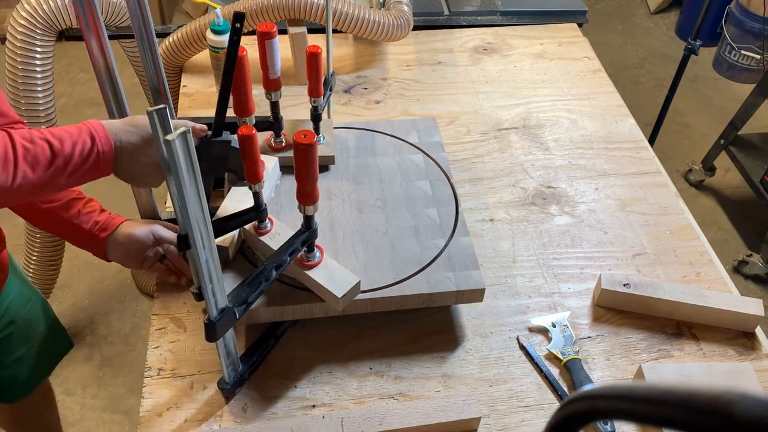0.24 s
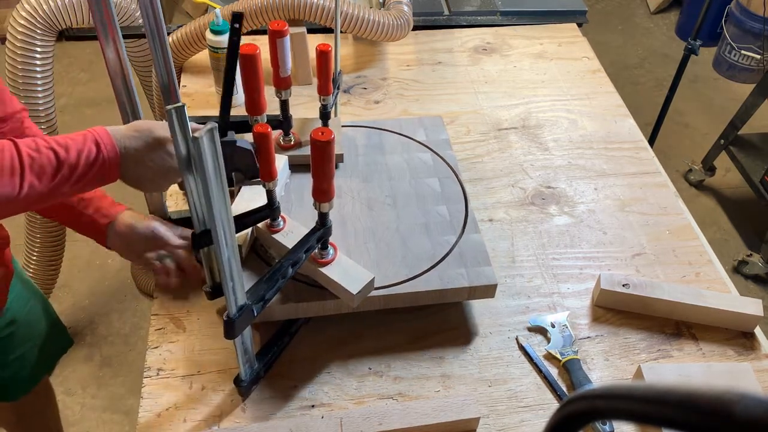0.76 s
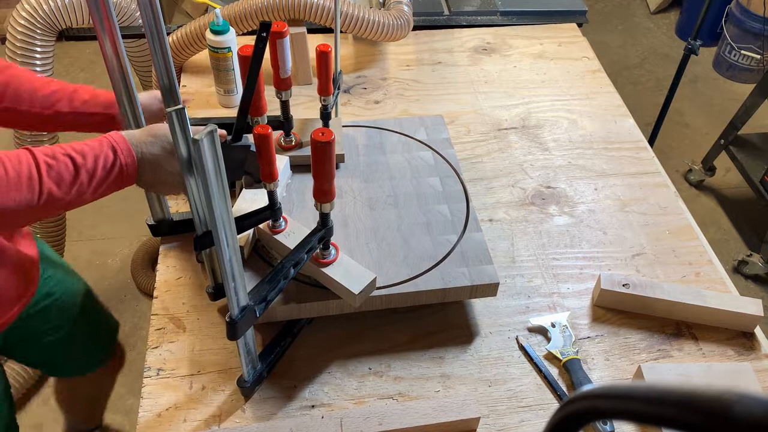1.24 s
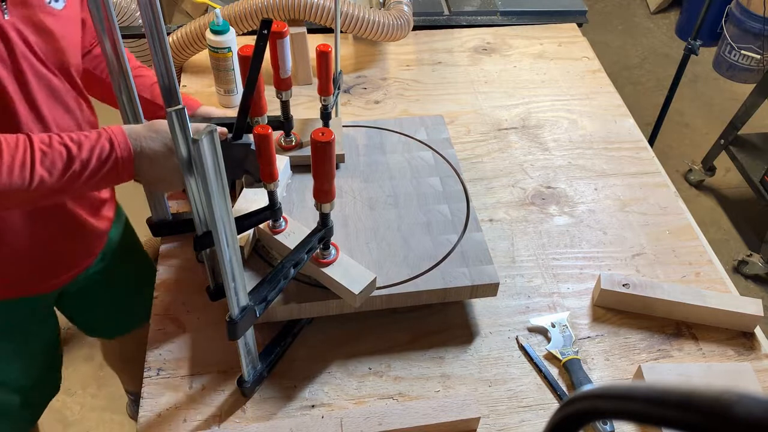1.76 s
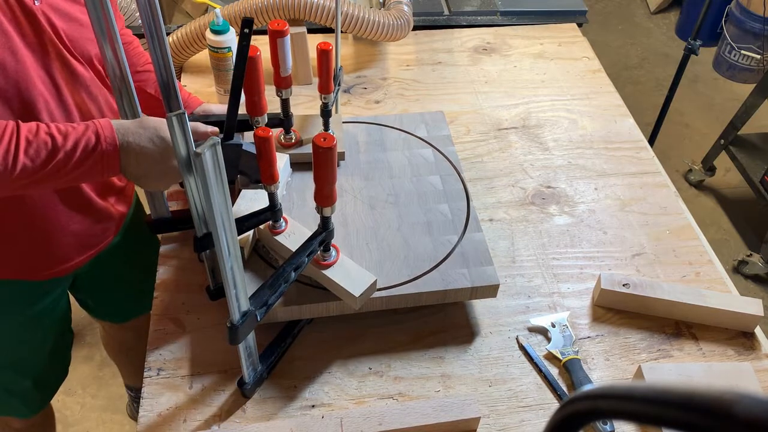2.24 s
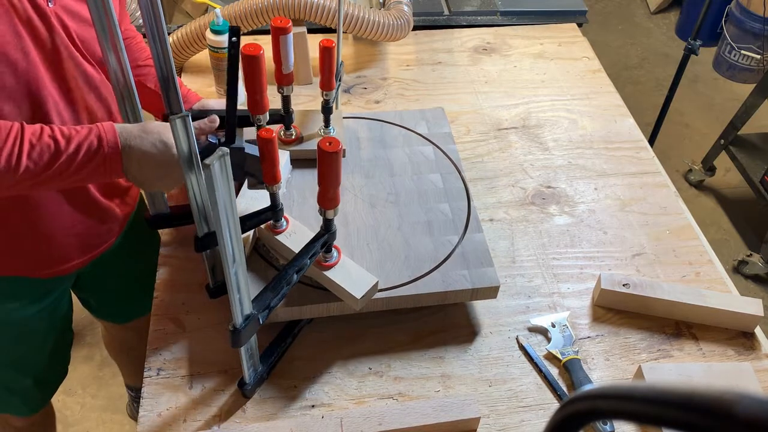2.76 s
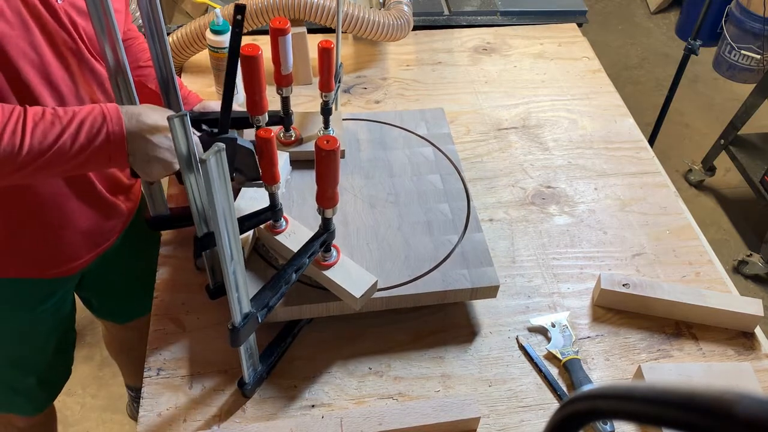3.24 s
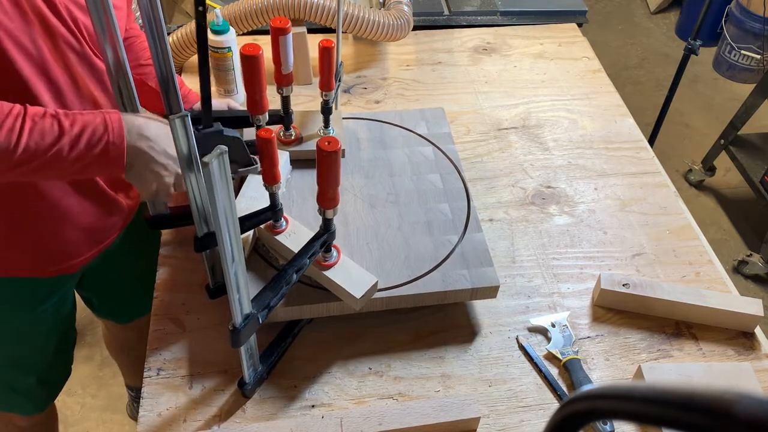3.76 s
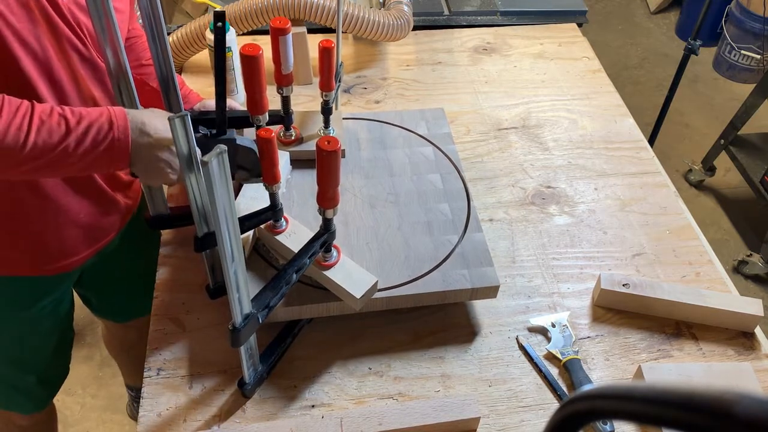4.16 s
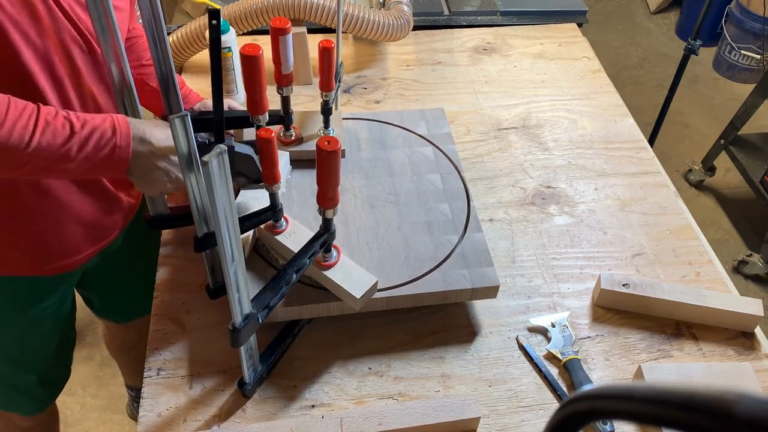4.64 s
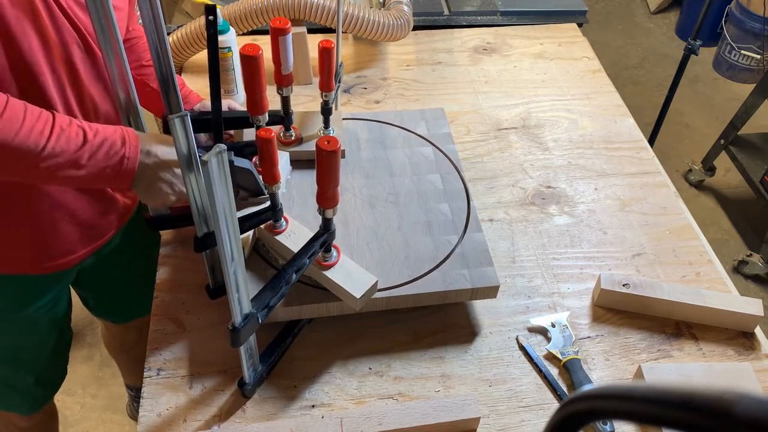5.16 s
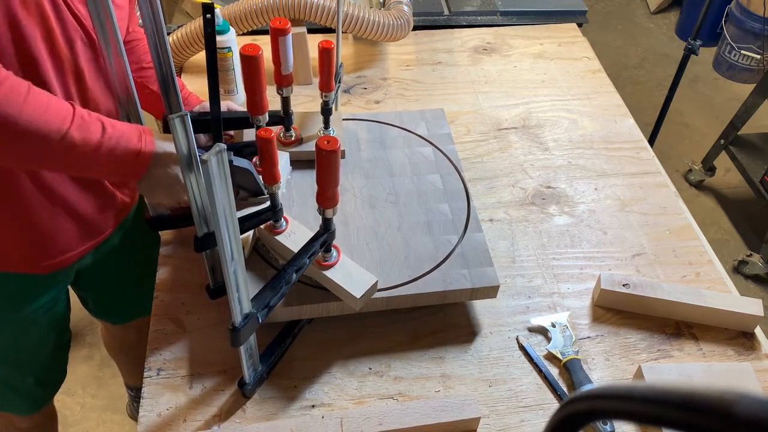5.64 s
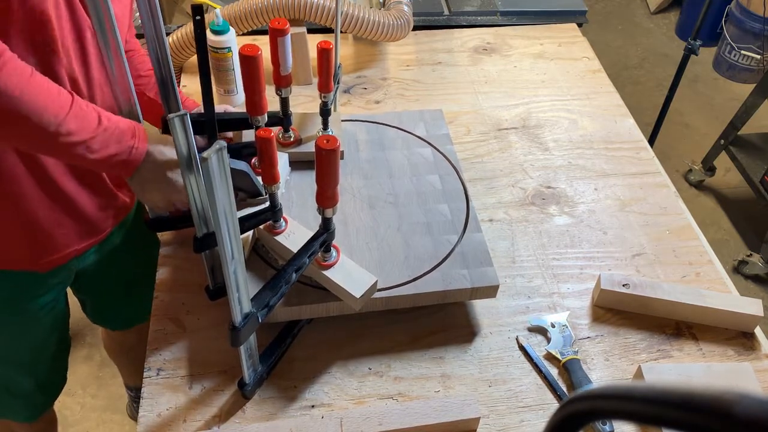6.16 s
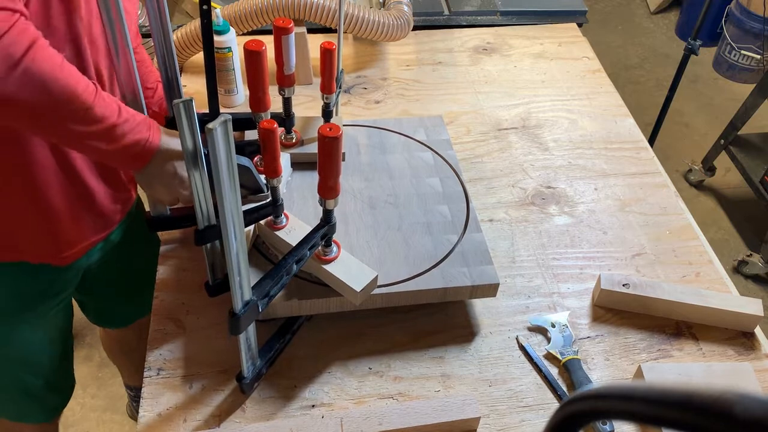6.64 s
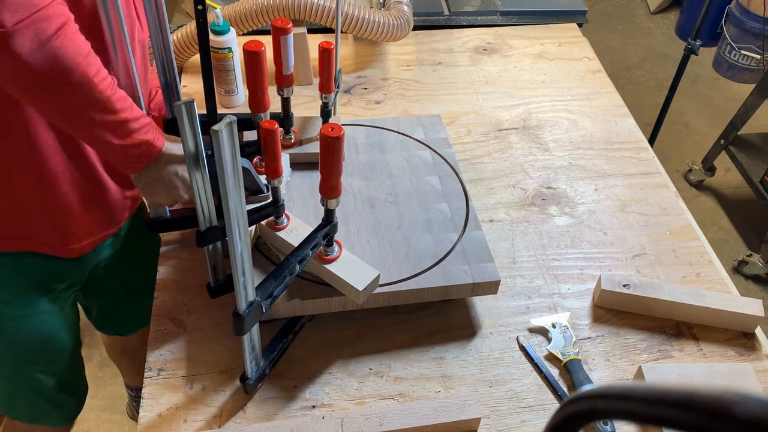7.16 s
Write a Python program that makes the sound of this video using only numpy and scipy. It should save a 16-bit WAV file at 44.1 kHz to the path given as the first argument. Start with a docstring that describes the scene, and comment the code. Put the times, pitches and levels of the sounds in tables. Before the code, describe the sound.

A close, fairly dry stereo workshop scene over a very quiet steady hum and hiss. From 0 to 0.9 s, dull low bench bumps, gritty wood rubbing and light clicks, with a short steel scrape near 0.8 s. At about 1.35 s a bright metallic scrape and click; at 1.9 s a woody tap, then a quick run of tiny high ticks around 2.0 to 2.2 s. A soft low rub and bump near 2.6 to 2.8 s. At 3.1 s one hard hollow wooden knock, then mostly faint bumps until 4.2 s. From 4.2 to 5.4 s steel jaws and bars rattle and clack loudly and densely, with wood knocking beneath. Small clicks at 5.65 to 6.0 s, a sharper clack at 6.16 s. At 6.35 s a heavy, deep thump rocks the bench with strong knocks, booming again until about 6.75 s. Light metallic clicks and taps at 6.9, 7.0 and 7.36 s.

```python
"""Steel bar clamps are slid and tightened on wooden blocks at a workbench, over a quiet steady hum and hiss.
From the start the bench top rocks at its lowest mode, jaws scrape along the bars and blocks grind on the board.
Clicks and knocks join at once: each contact strikes decaying modes, and random grains shake them in between.
A hard wooden knock falls at about 3.1 s; from 4.2 to 5.4 s steel and wood chatter densely and loudly.
Near 6.35 s a heavy shove rocks the bench hardest, with strong knocks; lighter contacts follow to the end."""
import sys
import numpy as np
from scipy import signal
from scipy.fft import rfft, irfft, next_fast_len
from scipy.io import wavfile
from scipy.ndimage import uniform_filter1d

SR = 44100
rng = np.random.default_rng(int(sys.argv[2]) if len(sys.argv) > 2 else 0)


def output_pcm(signal):
    """Save a mono or channel-first signal as 16-bit PCM at the path in sys.argv[1].

    Samples are clipped to [-1, 1] before scaling.
    """
    pcm = np.clip(np.atleast_2d(signal).T, -1, 1) * 32767
    wavfile.write(sys.argv[1], SR, np.round(pcm).astype(np.int16))


N = 326781


def from_db(db):
    """Amplitude gain of a level in dB."""
    return 10 ** (np.asarray(db) / 20)


def rms_one(x):
    """Scaled to rms 1 over all its channels."""
    return x / np.sqrt(np.mean(x ** 2) + 1e-20)


def at_hz(points, hz):
    """Reads a table on a log-frequency axis."""
    p = np.array(points, float)
    return np.interp(np.log(hz + 1), np.log(p[:, 0] + 1), p[:, 1])


def low_pass(x, order, cutoff_hz):
    """Butterworth low-pass, kept below the Nyquist limit."""
    sos = signal.butter(order, min(cutoff_hz, .45 * SR), fs=SR, output="sos")
    return signal.sosfilt(sos, x)


def waver(smoothing_s):
    """Slow random drift of rms 1: noise on a coarse grid, smoothed twice."""
    step = 50   # samples
    width = int(smoothing_s * SR / step)
    noise = rng.standard_normal(N // step + 2)
    slow = uniform_filter1d(uniform_filter1d(noise, width), width)
    return np.interp(np.arange(N) / step, np.arange(len(slow)), rms_one(slow))


def strokes(rows, fades_db_per_s):
    """Gain of each part: a stroke swells, holds, then fades at the part's own rate; overlaps add in power."""
    swell_range_db = 30.5
    t = np.arange(0, N + 32, 32) / SR   # coarse grid
    power = 0
    for start_s, rise_s, hold_s, *levels_db in rows:
        swell_db = swell_range_db * np.minimum((t - start_s) / max(rise_s, .002) - 1, 0)
        fading_s = np.maximum(t - start_s - rise_s - hold_s, 0)
        fade_db = np.outer(fades_db_per_s, fading_s)
        stroke_db = np.array(levels_db)[:, None] + swell_db - fade_db
        power = power + (t >= start_s) * from_db(2 * stroke_db)
    return [np.interp(np.arange(N) / SR, t, np.sqrt(p)) for p in power]


def grit(per_s, spread_db):
    """Tiny slips at random moments with uneven sizes: a direct and a reflected stream; rms 1."""
    uneven_db = spread_db * np.minimum(rng.exponential(1, (2, N)), 4)
    sizes = from_db(uneven_db) * rng.standard_normal((2, N))
    slipping = rng.random((2, N)) < per_s / SR
    return rms_one(sizes * slipping)


def blows(times, levels_db, t60, rise_s):
    """Envelope of contacts: a quick rise, then chatter and echoes dying away; overlaps add in power."""
    power = np.zeros(N)
    for s, level_db in zip(times, levels_db):
        at = int(s * SR)
        t = np.arange(min(N - at, int(t60 * SR) + 1)) / SR
        decay = from_db(2 * (level_db - 60 * t / t60))
        power[at:at + len(t)] += decay * (1 - np.exp(-t / rise_s)) ** 2
    return np.sqrt(power)


def ring(x, hz, width_hz, gain):
    """One mode: a resonator with the given gain at its peak; a wider one dies away sooner."""
    r = np.exp(-np.pi * width_hz / SR)
    top = gain * (1 - r * r) / 2
    return signal.lfilter([top, 0, -top], [1, -2 * r * np.cos(2 * np.pi * hz / SR), r * r], x)


def body(grains, rubbing, hits, modes, broad_db, strike_db, crack_db, rise_s, grip_db):
    """Rubbing grains, the chatter after each hit and the hit itself shake a set of modes and the band they span."""
    times, level_db, t60, spot_hz = hits
    at = (times * SR).astype(int)
    shaken = grains * np.hypot(rubbing, blows(times, level_db, t60, rise_s))
    drive = np.vstack([shaken, grains[:1]]) + 1e-18   # direct, reflected, and plain grains to set the scale

    cracked = drive.copy()
    cracked[0, at] += from_db(level_db + crack_db)   # the first touch is one sharp pulse
    edges = [0.8 * modes[0][0], min(1.09 * modes[-1][0], .45 * SR)]
    band = signal.butter(3, edges, "band", fs=SR, output="sos")
    out = from_db(broad_db) * signal.sosfilt(band, cracked)

    latest = np.maximum(np.searchsorted(at, np.arange(N), "right") - 1, 0)
    # the reflection of a hit comes from either side
    facing = np.array([np.ones(len(times)), rng.choice([-1, 1], len(times))])
    uneven_db = rng.normal(0, 1.0, (len(times), 2 * len(modes)))
    for k, (hz, width_hz, mode_db) in enumerate(modes):
        # the struck spot favours the modes near its pitch
        spot_db = -np.minimum(45 * np.abs(np.log2(hz / spot_hz)), 14)
        hit_db = level_db + strike_db + spot_db + uneven_db[:, 2 * k:2 * k + 2].T
        strikes = np.full((2, N), 1e-18)
        strikes[:, at] = from_db(hit_db) * facing / width_hz
        held_db = 0.43 * spot_db[latest]   # rubbing goes on at the spot last struck
        shifting_db = grip_db * np.tanh(waver(0.067))   # a randomly shifting grip frees or damps each mode
        struck = drive * from_db(held_db + shifting_db)
        struck[:2] += low_pass(strikes, 2, 0.83 * hz)   # contact lasts part of a cycle
        out += ring(struck, hz, width_hz, from_db(mode_db) * (-1) ** k)   # polarity alternates
    out = low_pass(out, 2, 0.98 * modes[-1][0])   # little radiates above the top mode
    return out[:2] / np.std(out[2])


# hum and hiss spectrum, relative: (f/Hz, level/dB per Hz)
HUM_AND_HISS = [(18, -63.5), (30, -25), (56, -0.5), (75, 0), (109, -15.5), (512, -26), (913, -34),
                (1810, -35.5), (3310, -36.5), (3580, -35), (8980, -41.5), (10800, -35), (16000, -41.5)]


def workshop():
    """Steady quiet hum and hiss: noise shaped in frequency, independent in the two streams."""
    hz = np.fft.rfftfreq(N, 1 / SR)
    spectrum = rfft(rng.standard_normal((2, N))) * from_db(at_hz(HUM_AND_HISS, hz))
    return from_db(-74) * rms_one(irfft(spectrum, N))


# shoves that set the bench top rocking: (t/s, rise/s, hold/s, level/dB)
SHOVES = [(-0.053, 0.041, 0.065, -69), (0.102, 0.19, 0.005, -43.5), (0.351, 0.099, 0.064, -47.5),
          (0.618, 0.23, 0.0, -57), (0.84, 0.13, 0, -54), (1.703, 0.042, 0.038, -59),
          (1.821, 0.084, 0.11, -53), (2.172, 0.059, 0.11, -61.5), (2.619, 0.2, 0.041, -49),
          (2.92, 0.025, 0.061, -64.5), (3.075, 0.08, 0.064, -57.5), (3.284, 0.056, 0.16, -59.5),
          (3.482, 0.21, 0.0, -61), (3.809, 0.2, 0.0, -52), (4.076, 0.058, 0.055, -65),
          (4.209, 0.085, 0.2, -63), (4.297, 0.206, 0.118, -54.5), (4.624, 0.26, 0.017, -57),
          (4.914, 0.027, 0.033, -56), (5.033, 0.18, 0.072, -54.5), (5.258, 0.071, 0.16, -58.5),
          (5.594, 0.066, 0.23, -62.5), (5.998, 0.062, 0, -75), (6.159, 0.055, 0.12, -57),
          (6.344, 0.04, 0.12, -33), (6.535, 0.053, 0.02, -36), (6.724, 0.22, 0.013, -41.5),
          (7.075, 0.029, 0.031, -55), (7.239, 0.0064, 0.179, -70.0)]
# fade of the rocking after each shove: (fade/dB per s)
BENCH_FADE = [245]


def bench():
    """The lowest mode of the top: a sine whose pitch wavers slowly at random."""
    pitch_hz = 65.6 + 6.6 * waver(0.054)
    phase = 2 * np.pi * np.cumsum(pitch_hz) / SR
    return np.sqrt(2) * strokes(SHOVES, BENCH_FADE)[0] * np.sin(phase)


# strokes of jaws scraping along the steel bars:
# (t/s, rise/s, hold/s, bar level/dB, jaw level/dB, thin edge level/dB)
SCRAPES = [(-0.044, 0.033, 0.0072, -74.5, -72.5, -81), (0.115, 0.015, 0.002, -66, -72.0, -85),
           (0.203, 0.0074, 0.005, -95, -71, -90), (0.34, 0.025, 0.1, -87, -65, -87),
           (0.44, 0.084, 0.067, -86, -63, -87), (0.794, 0.14, 0.039, -49, -52, -55),
           (1.08, 0.12, 0.016, -78, -68.5, -80), (1.339, 0.023, 0.049, -47.5, -47.5, -56.5),
           (1.516, 0.21, 0.07, -72, -70.5, -79.5), (1.824, 0.046, 0.009, -66, -66.5, -65),
           (1.944, 0.026, 0.002, -73, -78, -77), (2.004, 0.15, 0.036, -64.5, -70.5, -63.0),
           (2.029, 0.014, 0.066, -69.5, -77, -70), (2.543, 0.23, 0.0016, -81, -68, -82),
           (3.058, 0.0069, 0.027, -83, -69.5, -89), (3.104, 0.008, 0.004, -70, -57, -83),
           (3.243, 0.071, 0.027, -79, -67, -84), (3.526, 0.0098, 0.0027, -89.0, -93, -90),
           (3.591, 0.027, 0.039, -77.5, -78, -80.5), (3.703, 0.17, 0.06, -87, -79, -85.5),
           (4.009, 0.091, 0.1, -88.5, -74.5, -91), (4.256, 0.017, 0.069, -51.5, -50.5, -54),
           (4.418, 0.026, 0.021, -43.5, -47, -45), (4.529, 0.015, 0.011, -36, -42.5, -37.5),
           (4.607, 0.154, 0.019, -37, -41, -38.5), (4.66, 0.013, 0.0076, -48, -48.5, -47.5),
           (4.862, 0.037, 0.1, -39.5, -43.5, -41.5), (5.084, 0.02, 0.019, -44, -48, -43.5),
           (5.155, 0.014, 0.011, -42.5, -45, -43.5), (5.331, 0.017, 0.019, -52, -53.5, -50.5),
           (5.553, 0.17, 0.14, -72, -67.5, -85), (5.78, 0.013, 0.002, -65, -66, -85),
           (5.856, 0.006, 0.002, -61, -67, -72), (5.89, 0.0073, 0.0087, -67, -69.5, -74),
           (5.965, 0.01, 0.00067, -79.0, -73.5, -87), (6.151, 0.01, 0.021, -51.0, -49, -54.5),
           (6.355, 0.0064, 0.02, -68, -54.5, -70), (6.436, 0.091, 0.002, -74.5, -60, -81),
           (6.85, 0.1, 0.075, -71.0, -68, -84), (7.019, 0.0093, 0.002, -56.5, -52, -59),
           (7.021, 0.17, 0.07, -64.5, -63.5, -70), (7.345, 0.017, 0.02, -62, -60.5, -69)]
# fade after each scrape: (bar, jaw, thin edges), each fade/dB per s
STEEL_FADES = [222.5, 166.5, 308.5]
# clicks of a jaw catching on the bar:
# (t/s, bar level/dB, jaw level/dB, thin edge level/dB, struck pitch of jaw f/Hz)
CATCHES = [(.1292, -76, -79, -70, 3310), (0.209, -86, -66.5, -85, 2750), (0.3635, -83, -60.5, -81, 2217),
           (.6136, -82, -80, -72, 2407), (.8609, -78, -64, -74, 2247), (1.2104, -76, -79, -77, 2860),
           (1.356, -59, -68, -49, 3320), (1.3638, -56, -68, -55, 2195), (1.875, -65, -70, -56, 2365),
           (1.9635, -74, -87, -68, 3290), (2.0433, -58, -76, -57, 3310), (2.0826, -73, -80, -58, 2780),
           (2.0937, -59, -73, -50, 3320), (2.1216, -55, -75, -52, 3270), (2.1524, -53, -66, -52, 3320),
           (2.1735, -55, -76, -53, 3300), (3.066, -79, -73, -99, 2410), (3.1137, -65, -54, -73, 2260),
           (3.5374, -80, -90, -94, 2253), (4.2722, -46, -56, -41, 2270), (4.31, -45, -49.5, -43, 2240),
           (4.4296, -54, -54.5, -48, 2990), (4.441, -43, -48, -44, 2250), (4.4539, -38, -53, -34, 3290),
           (4.5444, -35, -42, -31.5, 3010), (4.6738, -41.5, -50, -38, 2344), (4.736, -38, -55, -33.5, 3300),
           (4.7593, -26.5, -55, -32.5, 2740), (4.8867, -55, -48, -34, 2450),
           (4.9157, -33, -52, -30.5, 2630), (4.946, -35, -55, -32, 2250), (4.98, -31, -49, -33, 2720),
           (5.1043, -54, -44.5, -41, 2450), (5.1344, -38, -47, -52, 2420), (5.173, -37, -49, -43, 2373),
           (5.352, -55, -54, -46, 2256), (5.3587, -44, -52, -36, 2420), (5.65, -69.5, -71, -78.5, 2250),
           (5.698, -65, -62, -63, 2750), (5.746, -63, -61, -67, 2365), (5.7635, -58.5, -76, -66, 2395),
           (5.7996, -54, -56.5, -65, 3300), (5.8638, -55.5, -59, -57.5, 2410),
           (5.9003, -52.5, -65, -57, 2245), (5.975, -67.5, -67, -65, 2200), (6.163, -60, -51, -46.5, 2400),
           (6.1707, -45, -45, -42, 2460), (6.3635, -69, -46.5, -58, 2674), (6.443, -83, -54, -83, 2760),
           (6.519, -70, -58, -67, 2870), (6.889, -83, -64, -74.5, 2415), (6.932, -61, -62, -58, 2250),
           (6.9688, -54.5, -60, -64, 2254), (7.029, -48.5, -54.5, -43, 2253), (7.3565, -66, -58, -64, 2590)]
# modes of the jaw: (f/Hz, width/Hz, level/dB)
JAW_MODES = [(2080, 17, -23.5), (2316, 62, 3.5), (2660, 16, -8), (2860, 49, -8), (2830, 18, 1),
             (3067, 17, 1), (3303, 57, -11.5)]
# modes of the bar: (f/Hz, width/Hz, level/dB)
BAR_MODES = [(4334, 127, 12.5), (4332, 200, 10.5), (5240, 60, -24), (6000, 180, -19.5), (6130, 42, -24.5),
             (6986, 44, -7), (7370, 190, -11.5)]
# modes of the thin edges: (f/Hz, width/Hz, level/dB)
EDGE_MODES = [(9200, 260, 17.5), (9720, 1300, 11.9), (12050, 500, 8.4), (15000, 740, 3.9)]


def steel():
    """Scrapes and clicks ring jaw, bar and thin edges together, all driven by the same grains."""
    bar, jaw, edge = strokes(SCRAPES, STEEL_FADES)
    s, bar_db, jaw_db, edge_db, jaw_hz = np.transpose(CATCHES)
    bar_hz, edge_hz = np.full(len(s), 6900.), np.full(len(s), 11000.)
    jaw_t60, bar_t60, edge_t60 = 0.15, 0.049, 0.025   # s, chatter after a click
    grains = grit(6000, 1.7)
    out = body(grains, jaw, (s, jaw_db, jaw_t60, jaw_hz), JAW_MODES,
               broad_db=-3, strike_db=72.5, crack_db=10.0, rise_s=0.00045, grip_db=9.0)
    out += body(grains, bar, (s, bar_db, bar_t60, bar_hz), BAR_MODES,
                broad_db=-9.5, strike_db=73.0, crack_db=9.0, rise_s=0.0012, grip_db=-1.0)
    out += body(grains, edge, (s, edge_db, edge_t60, edge_hz), EDGE_MODES,
                broad_db=0.5, strike_db=66, crack_db=21.5, rise_s=0.00022, grip_db=5.5)
    return out


# strokes of blocks grinding on the board:
# (t/s, rise/s, hold/s, board level/dB, block level/dB, clamp pad level/dB)
GRINDS = [(-0.032, 0.013, 0.0076, -53.5, -58, -71.5), (0.129, 0.0051, 0.002, -58, -65.5, -64),
          (0.207, 0.0049, 0.002, -52, -59, -65), (0.31, 0.072, 0.0099, -52.5, -49.5, -56),
          (0.326, 0.21, 0.018, -59.5, -57.5, -67), (0.553, 0.12, 0.006, -55, -51.5, -63.5),
          (0.799, 0.055, 0.19, -69.5, -64, -65), (1.13, 0.066, 0.033, -83, -71.5, -68),
          (1.285, 0.096, 0.058, -75, -64, -57.0), (1.55, 0.081, 0.038, -91, -78, -71),
          (1.647, 0.081, 0.0063, -55.5, -58.5, -68), (1.862, 0.0071, 0.002, -49.5, -45.5, -59.5),
          (1.95, 0.047, 0.038, -61.5, -71.5, -79.5), (2.203, 0.0046, 0.027, -60.5, -69.5, -77.5),
          (2.585, 0.18, 0.002, -47, -50.0, -65.5), (2.59, 0.0093, 0.042, -57, -79, -78),
          (2.909, 0.043, 0.017, -65, -65, -73.5), (3.107, 0.0067, 0.002, -39.5, -34, -42),
          (3.25, 0.059, 0.0025, -47, -47.5, -58), (3.409, 0.0037, 0.001, -53.5, -82, -93),
          (3.583, 0.034, 0.0045, -58.5, -74.5, -74.5), (3.926, 0.0068, 0.0018, -56.5, -53.5, -70),
          (4.005, 0.096, 0.18, -57.5, -65.5, -69.5), (4.236, 0.054, 0.058, -57.5, -46.5, -54),
          (4.392, 0.049, 0.03, -46.5, -48, -49), (4.51, 0.038, 0.012, -45, -41, -45.5),
          (4.578, 0.16, 0.049, -42.5, -37, -44), (4.655, 0.012, 0.02, -51.5, -51.5, -48),
          (4.845, 0.058, 0.089, -42.5, -38.5, -42), (5.006, 0.14, 0.048, -42.0, -42.5, -44.5),
          (5.09, 0.0085, 0.01, -48, -49, -49), (5.314, 0.036, 0.011, -49.5, -43.5, -45),
          (5.565, 0.071, 0.15, -57, -60.5, -67), (5.642, 0.24, 0.017, -69, -61, -58.5),
          (5.963, 0.014, 0.0042, -70, -63, -66), (6.158, 0.0099, 0.028, -55, -40.5, -45.5),
          (6.357, 0.0063, 0.16, -36.5, -45, -54.5), (6.64, 0.0077, 0.002, -54, -63, -72.0),
          (6.856, 0.059, 0.051, -61.5, -53, -55.5), (6.99, 0.038, 0.084, -61, -62.5, -61.5),
          (7.047, 0.23, 0.002, -66.5, -73, -67.5), (7.358, 0.0073, 0.012, -56, -48, -48)]
# fade after each grind: (board, block, clamp pad), each fade/dB per s
WOOD_FADES = [144, 186, 185.5]
# knocks of wood on wood: (t/s, block level/dB, board level/dB, clamp pad level/dB,
# struck pitch of block f/Hz, struck pitch of pad f/Hz)
WOOD_KNOCKS = [(.133, -72, -83, -67, 329, 1350), (0.211, -59, -60, -66, 424, 800),
               (.364, -51, -76, -61.5, 320, 1160), (.54, -68, -75, -72, 434, 926),
               (.658, -56.5, -79, -63, 335, 934), (0.865, -76, -58, -59, 325, 815),
               (1.208, -72, -90, -64, 750, 980), (1.35, -69, -89, -57.5, 718, 1650),
               (1.706, -54.5, -64, -90, 330.4, 845), (1.866, -45, -78, -53.5, 709, 832),
               (2.206, -73.5, -80, -76, 412, 1590), (2.599, -76, -61, -81, 328.5, 1410),
               (2.734, -68, -55, -59.5, 332, 840), (2.778, -71, -44.5, -67, 341, 840),
               (3.112, -35, -37, -48, 598, 1090), (3.313, -75, -58, -68, 496, 1100),
               (3.426, -64.5, -59, -91, 336, 1420), (3.615, -85, -65, -76, 331, 1510),
               (3.930, -68, -47, -75.5, 337, 1070), (4.09, -65.5, -56, -77, 332, 1120),
               (4.273, -64, -57.5, -55, 343.6, 1010), (4.314, -48.5, -68, -61, 331, 930),
               (4.447, -56, -62, -55, 654, 980), (4.535, -57.5, -41, -58, 330, 996),
               (4.669, -66, -59.5, -49, 325, 1140), (4.75, -40.5, -60.5, -48, 690, 987),
               (4.788, -46, -47.5, -61, 524, 890), (4.898, -63, -48.5, -44, 319.4, 1120),
               (4.945, -47, -54, -55.5, 658, 992), (5.1, -59.5, -50.5, -47.5, 329, 1113),
               (5.166, -40, -55.5, -62, 332, 1030), (5.211, -43.5, -45, -50.5, 340, 904),
               (5.343, -57.5, -81, -46, 338, 1290), (5.659, -68, -49.5, -80.5, 346, 1040),
               (5.693, -57, -76, -65, 345, 900), (5.798, -75, -63.5, -56.5, 675, 910),
               (5.863, -74, -85, -62, 748, 830), (5.902, -58.5, -83, -63.5, 694, 836),
               (5.974, -74, -73, -63, 708, 810), (6.162, -61, -71.5, -52.5, 751, 1037),
               (6.363, -35.5, -52, -42.5, 318, 957), (6.446, -45.5, -36, -51.5, 327, 1450),
               (6.517, -51, -57, -62, 334, 966), (6.645, -53, -62, -66, 336, 930),
               (6.898, -56.5, -60, -64, 750, 830), (6.933, -58, -66, -55.5, 740, 1085),
               (7.035, -57, -80, -48.5, 743, 830), (7.357, -75, -70, -57.5, 329, 815)]
# modes of the board: (f/Hz, width/Hz, level/dB)
BOARD_MODES = [(109, 7.7, -6), (172.2, 9.7, -1.5), (202.2, 15, -9), (228, 43, -0.5), (277, 38, 1)]
# modes of the blocks: (f/Hz, width/Hz, level/dB)
BLOCK_MODES = [(339.8, 21.7, 6), (406.4, 9.2, 1.5), (456, 65, 1), (547, 17, 2), (543, 38, -15.5),
               (667.8, 20, 3), (708.3, 12, -2), (766, 29, -2.5)]
# modes of the clamp pads: (f/Hz, width/Hz, level/dB)
PAD_MODES = [(833, 32, 2), (899, 38, 0.5), (1003, 40, 0), (1097.6, 16.6, 3.5), (1255, 17, -3),
             (1429, 49, 4), (1510, 79, -4), (1950, 10, -28)]


def wood():
    """Grinding and knocks share the modes of board, blocks and clamp pads, each with its own grains."""
    board, block, pad = strokes(GRINDS, WOOD_FADES)
    s, block_db, board_db, pad_db, block_hz, pad_hz = np.transpose(WOOD_KNOCKS)
    board_hz = np.full(len(s), 190.)
    board_t60, block_t60, pad_t60 = 0.18, 0.12, 0.027   # s, chatter after a knock
    out = body(grit(1200, 2.37), board, (s, board_db, board_t60, board_hz), BOARD_MODES,
               broad_db=-13.5, strike_db=61.0, crack_db=31.5, rise_s=.003, grip_db=5.0)
    out += body(grit(2000, 2.23), block, (s, block_db, block_t60, block_hz), BLOCK_MODES,
                broad_db=-18.5, strike_db=68, crack_db=30.5, rise_s=.0015, grip_db=5.5)
    out += body(grit(2500, 3.0), pad, (s, pad_db, pad_t60, pad_hz), PAD_MODES,
                broad_db=-8.0, strike_db=70.0, crack_db=22, rise_s=0.0012, grip_db=4)
    return out


# likeness of the two microphones: (f/Hz, share in common 0-1)
COMMON_SHARE = [(60, .995), (125, .995), (180, .97), (250, .88), (500, .72), (1000, .6), (2500, .6),
                (5000, .63), (8000, .91), (15000, .85)]
# phase by which the left side leads: (f/Hz, lead/rad)
LEFT_LEAD = [(0, 0), (950, -0.4), (1210, 1.0), (3190, 3.0), (3450, 2.9), (4130, 4.0), (6720, 5.5),
             (8870, 2.8), (10400, 0.4), (11300, 0.0), (12600, -2.7), (14000, -3.5), (15200, -6.0),
             (16500, -6.3)]
# level balance, left minus right: (f/Hz, level/dB)
LEFT_TILT = [(60, .4), (250, 1.2), (1000, 2.2), (2000, .2), (4000, -1), (8000, .3)]


def two_ports(streams):
    """The direct stream is common to both microphones, the reflected one opposes; the sides differ in phase."""
    size = next_fast_len(N + SR // 10)
    hz = np.fft.rfftfreq(size, 1 / SR)
    direct, reflected = rfft(streams, size)
    alike = np.clip(at_hz(COMMON_SHARE, hz), 0, 1)
    side = np.array([[1], [-1]])   # left, right
    ports = np.sqrt((1 + alike) / 2) * direct + side * np.sqrt((1 - alike) / 2) * reflected
    balance = from_db(side * at_hz(LEFT_TILT, hz) / 2)
    lead = np.exp(.5j * side * np.interp(hz, *np.transpose(LEFT_LEAD)))
    return irfft(ports * balance * lead, size)[:, :N]


def scene():
    """All sources as the two microphones hear them; the bench arrives only directly."""
    direct_only = [[1], [0]]
    return two_ports(workshop() + bench() * direct_only + steel() + wood())


# narrow gaps in the treble: (f/Hz, width/Hz)
TREBLE_GAPS = [(8650, 140), (13300, 510)]


def record(dry):
    """The lowest bass is weakened, narrow gaps are cut in the treble, then the top is cut steeply."""
    dry = signal.sosfilt(signal.butter(2, 45, "high", fs=SR, output="sos"), dry)
    for hz, width_hz in TREBLE_GAPS:
        edges = [hz - width_hz / 2, hz + width_hz / 2]
        dry = signal.sosfilt(signal.butter(1, edges, "bandstop", fs=SR, output="sos"), dry)
    return signal.sosfilt(signal.cheby2(12, 70, 16960, fs=SR, output="sos"), dry)


dry = scene()
out = record(dry)
output_pcm(out)
```